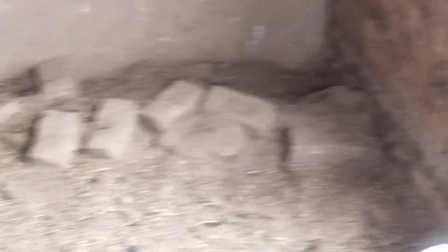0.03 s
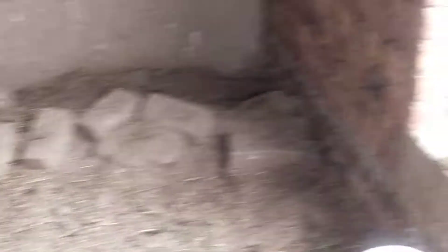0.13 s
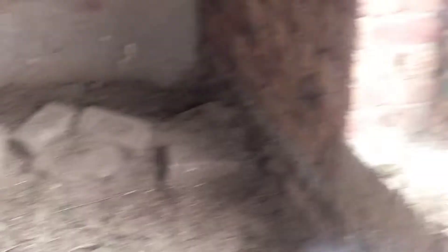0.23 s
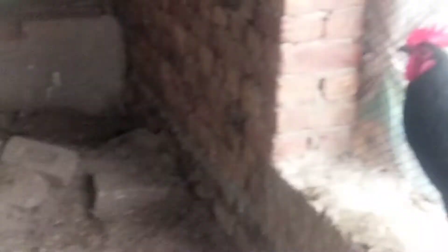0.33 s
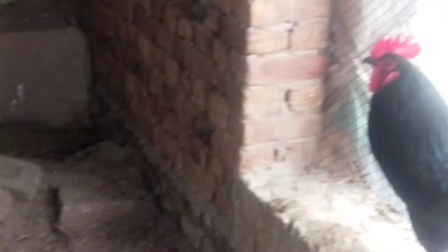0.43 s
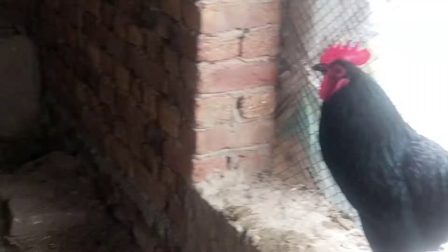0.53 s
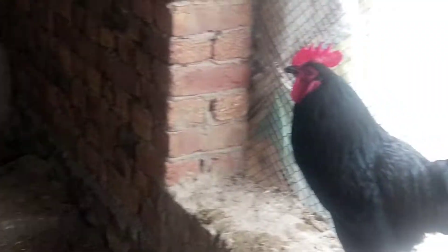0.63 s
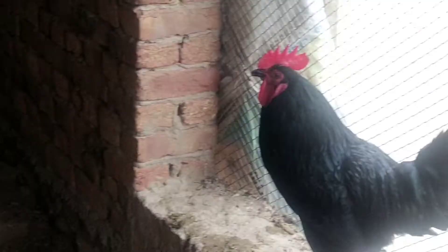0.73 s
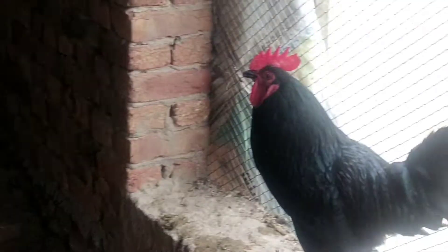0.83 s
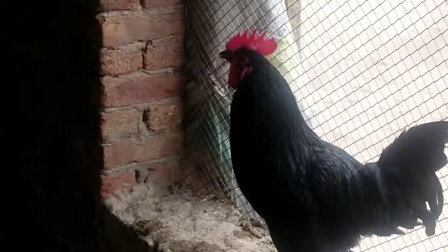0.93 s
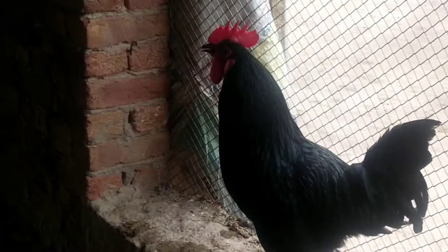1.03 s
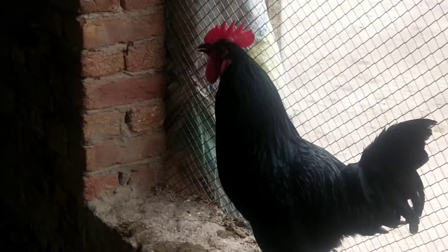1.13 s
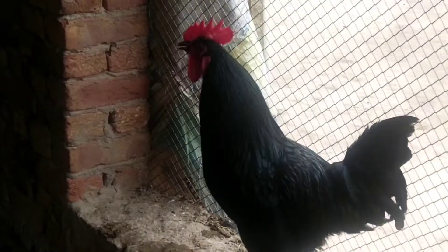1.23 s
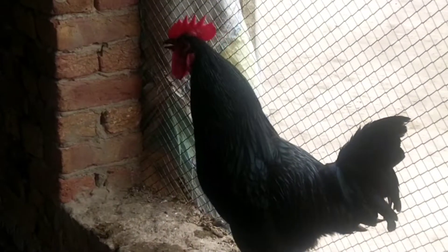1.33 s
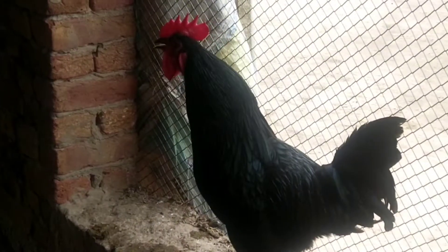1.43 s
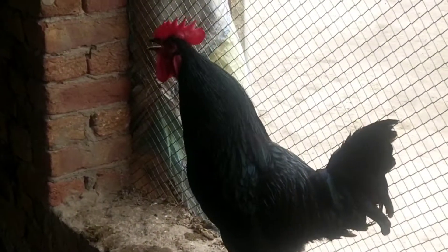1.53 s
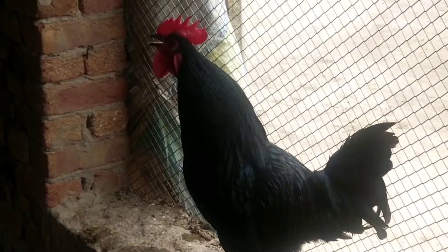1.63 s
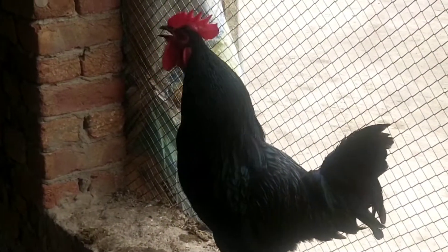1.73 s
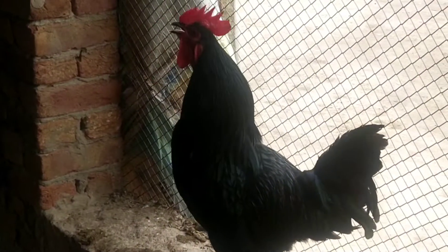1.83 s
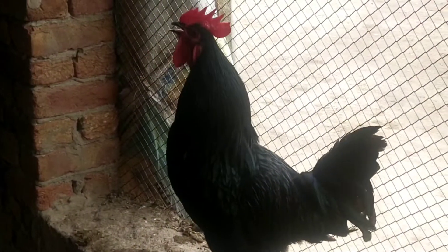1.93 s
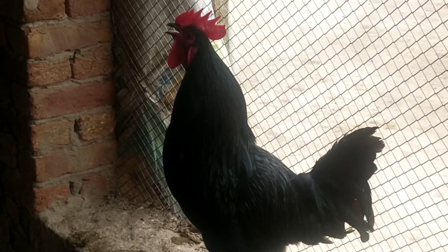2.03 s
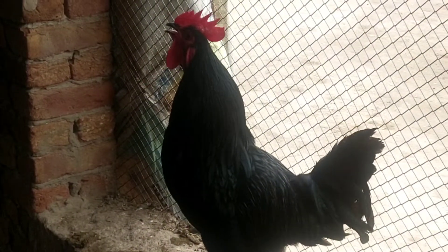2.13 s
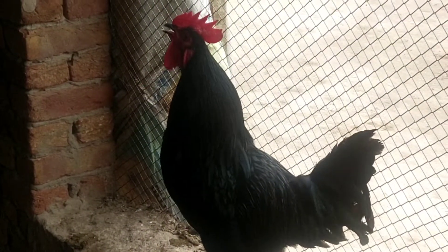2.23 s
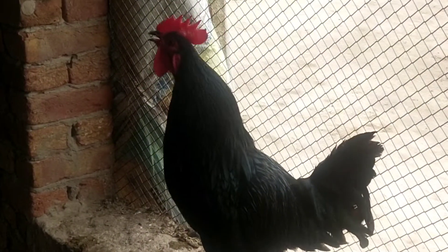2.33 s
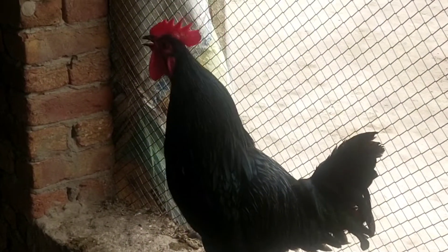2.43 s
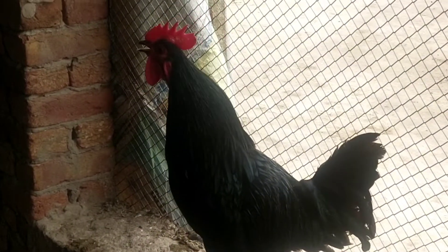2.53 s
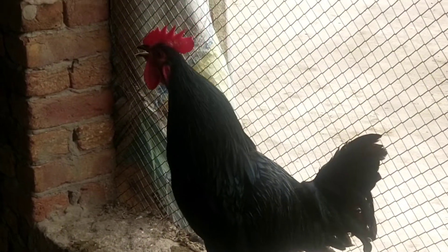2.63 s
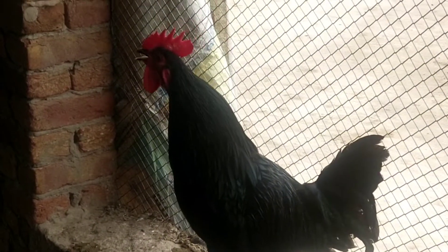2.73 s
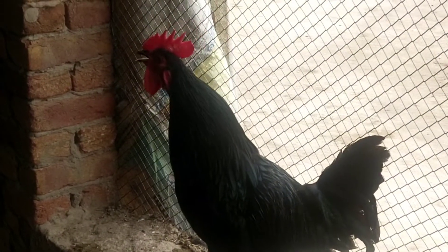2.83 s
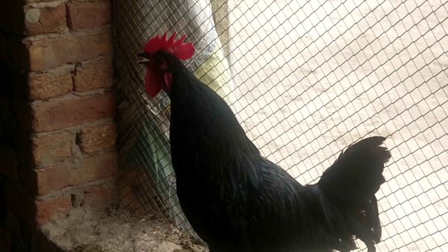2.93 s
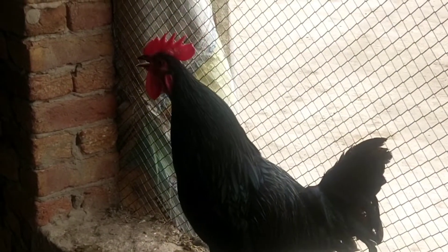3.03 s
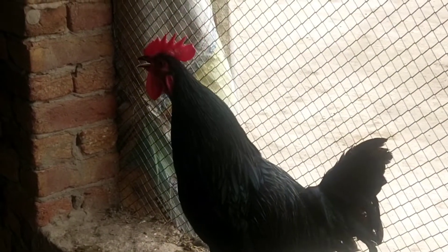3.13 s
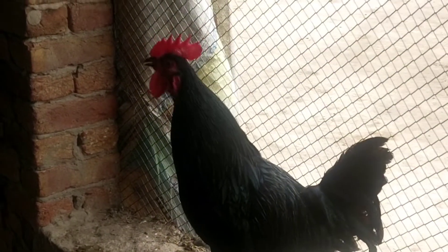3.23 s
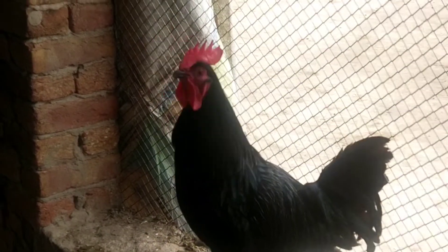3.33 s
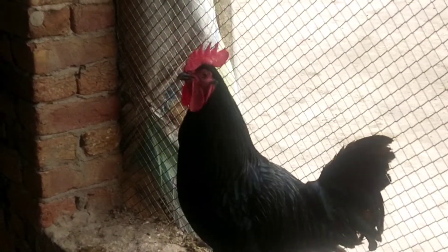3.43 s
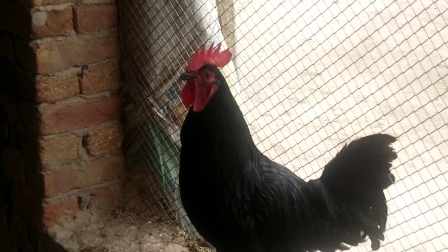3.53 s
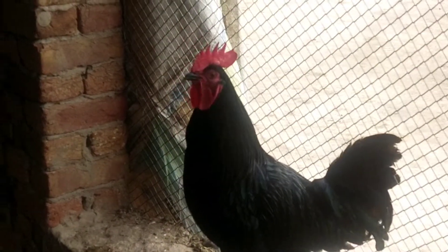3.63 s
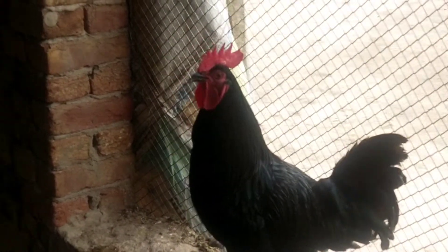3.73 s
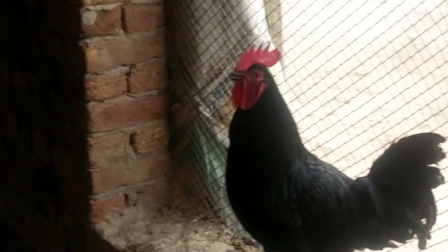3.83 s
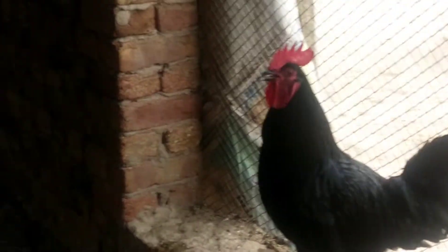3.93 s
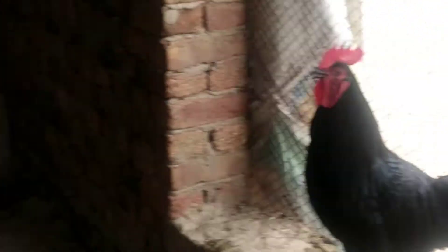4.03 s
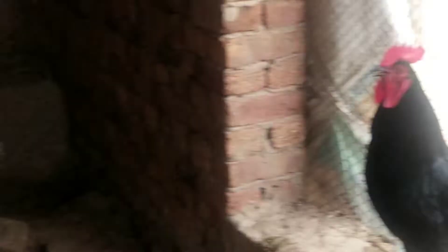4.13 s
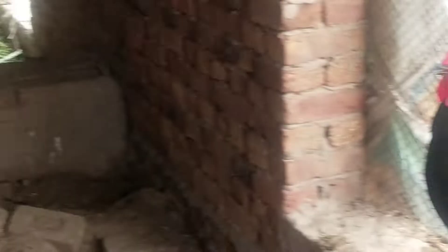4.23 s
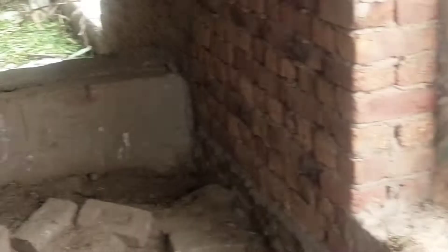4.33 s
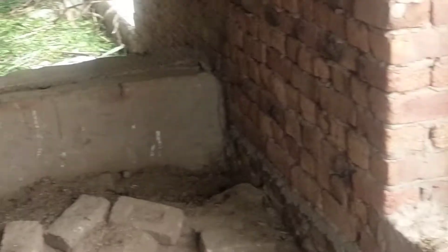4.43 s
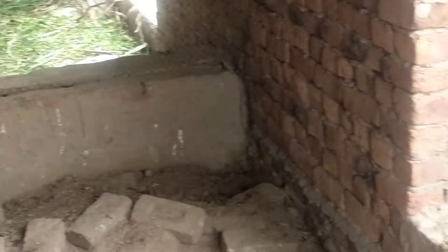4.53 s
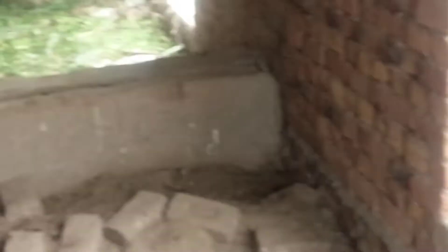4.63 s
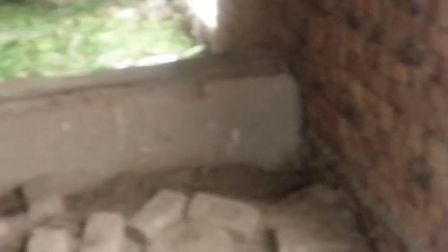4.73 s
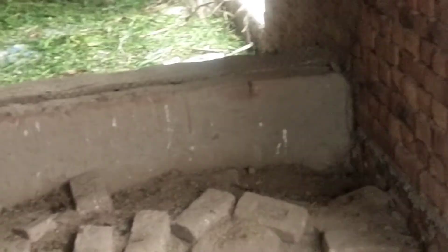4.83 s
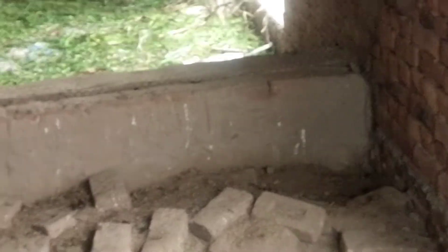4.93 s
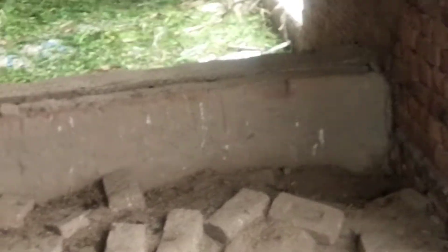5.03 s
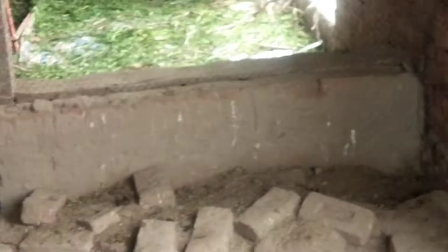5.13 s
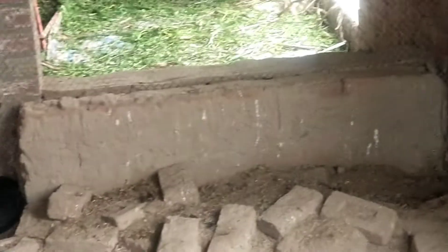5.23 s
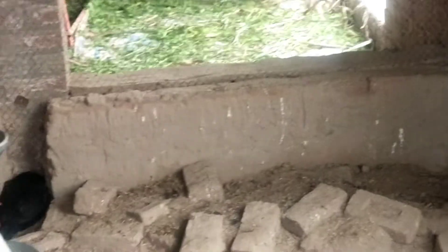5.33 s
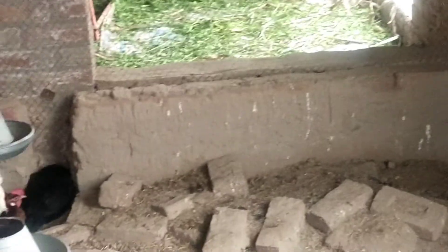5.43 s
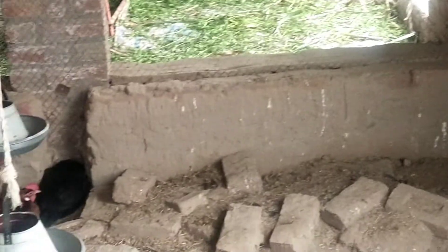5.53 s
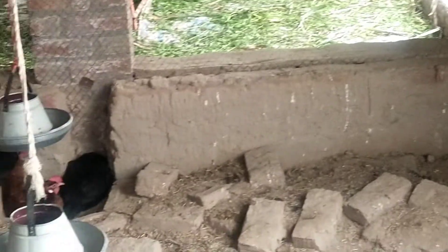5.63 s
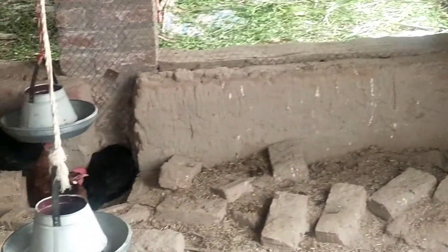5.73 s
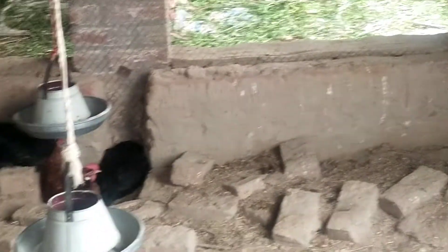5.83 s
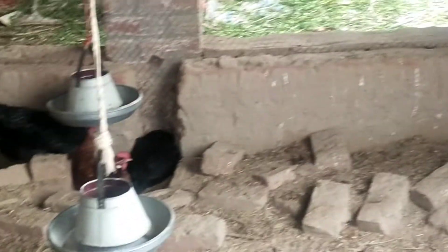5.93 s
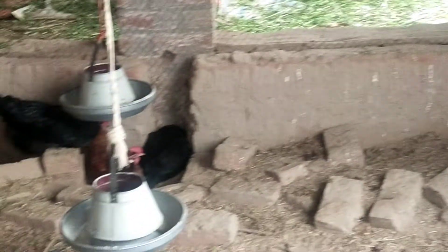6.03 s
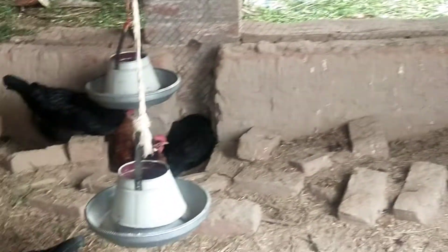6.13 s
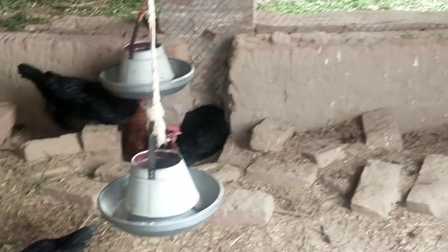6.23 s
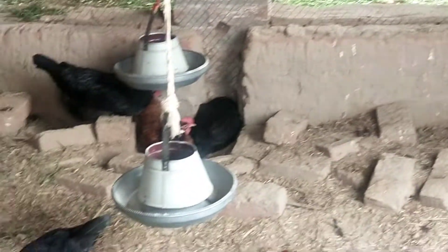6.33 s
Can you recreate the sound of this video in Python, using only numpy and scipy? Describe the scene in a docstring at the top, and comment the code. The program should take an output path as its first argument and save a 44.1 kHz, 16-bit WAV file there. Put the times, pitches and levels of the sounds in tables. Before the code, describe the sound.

Straw rustles softly over a low rumble in a brick pen. A nearby rooster crows once, loudly, starting hoarse, rising to a rough high note and holding a long one before trailing into a soft groan. Afterwards come quiet scuffs and dull knocks on dry dirt, a few light pecks at a feeder and one short hen cluck. The walls add a short echo.

```python
"""In a brick pen, a rooster crows once: a hoarse note, a high rough one, a long clean one, then a soft
groan as his air runs out. His voice is a stream of air pulses ringing in his throat. Afterwards he
breathes in, feet scuff the dirt, beaks tap a feeder and a hen clucks. The walls echo the birds and feet.
Underneath are a low rumble, rustling straw and, from far off, a faint whine and a brief drone."""
import sys
import numpy as np
from scipy import signal
from scipy.fft import rfft, irfft, next_fast_len
from scipy.io import wavfile
from scipy.ndimage import uniform_filter1d, minimum_filter1d

SR = 44100
rng = np.random.default_rng(int(sys.argv[2]) if len(sys.argv) > 2 else 0)


def log_audio(samples):
    """Write samples as a 16-bit WAV file to the path given in sys.argv[1]."""
    # one column per channel
    frames = np.atleast_2d(samples).T
    # limit to full scale, then quantise
    limited = np.clip(frames, -1, 1)
    pcm = np.round(limited * 32767).astype(np.int16)
    wavfile.write(sys.argv[1], SR, pcm)


N = 282240
TIME = np.arange(N) / SR


def from_db(db):
    """Turn decibels into a number to multiply by."""
    return 10 ** (np.asarray(db) / 20)


def rms_one(x):
    """Scale a sound to an average power of one."""
    return x / np.sqrt(np.mean(x ** 2) + 1e-20)


def evened(x, window_s=0.049):
    """Even out a sound so its power stays near one."""
    size = int(window_s * SR)
    power = uniform_filter1d(uniform_filter1d(x * x, size), size)
    return x / np.sqrt(np.abs(power) + 1e-12)


def in_time(rows):
    """Join timed rows with straight lines, one curve per column."""
    times, *columns = np.transpose(rows)
    return [np.interp(TIME, times, column) for column in columns]


def at_hz(points, hz):
    """Look up a value by frequency, on a scale of octaves."""
    frequencies, values = np.transpose(points)
    return np.interp(np.log(np.maximum(hz, 1)), np.log(frequencies), values)


def colour(x, points):
    """Give a sound its tone colour: make each frequency as strong as a table says."""
    size = next_fast_len(N + SR // 4, True)
    hz = np.maximum(np.arange(size // 2 + 1) * SR / size, 1)
    octaves_outside = np.abs(np.log2(hz / np.clip(hz, points[0][0], points[-1][0])))
    gain = from_db(at_hz(points, hz) - 30 * np.minimum(octaves_outside, 2))
    # make the filter ring after a sound, never before it (minimum phase)
    cepstrum = irfft(np.log(gain), size)
    cepstrum[1:size // 2] *= 2
    cepstrum[size // 2:] = 0
    return irfft(rfft(x, size) * np.exp(rfft(cepstrum)), size)[..., :N]


def band(x, low_hz, high_hz, order=4):
    """Keep what lies between two frequencies."""
    return signal.sosfilt(signal.butter(order, [low_hz, high_hz], "band", fs=SR, output="sos"), x + 1e-18)


def drift(rate):
    """A smooth random wobble that changes about `rate` times a second."""
    r = np.exp(-2 * np.pi * rate / SR)
    return rms_one(signal.lfilter([1], [1, -2 * r, r * r], rng.standard_normal(N + SR))[SR:])


def delayed(x, delay_ms):
    """The same sound, a little later."""
    return np.interp(TIME - delay_ms / 1000, TIME, x)


def ears(x, pan_db, lag_ms=0):
    """Place a sound: pan_db louder and lag_ms later in the left ear."""
    left, right = np.broadcast_to(x, (2, N))
    return np.array([delayed(left, lag_ms), right]) * from_db([[pan_db / 2], [-pan_db / 2]])


def stereo_noise(alike):
    """Hiss for two ears, from unrelated (0) to identical (1)."""
    mid, side = rng.standard_normal((2, N))
    return np.sqrt((1 + alike) / 2) * mid + np.sqrt((1 - alike) / 2) * side * np.array([[1], [-1]])


def grains(per_s, spread_db, alike):
    """Tiny random clicks of uneven size."""
    sizes = from_db(spread_db * np.minimum(rng.exponential(1, N), 4))
    return rms_one(stereo_noise(alike) * sizes * (rng.random(N) < per_s / SR))


def swell(start_s, length_s, rise_db_per_s, fall_db_per_s):
    """A loudness curve that rises, holds at one, then falls."""
    early, late = np.maximum(start_s - TIME, 0), np.maximum(TIME - start_s - length_s, 0)
    return from_db(-np.clip(rise_db_per_s * early + fall_db_per_s * late, 0, 200))


def blows(rows, t60):
    """A loudness curve of sudden hits, each fading by 60 dB in t60 seconds."""
    return sum(from_db(db - 60 * np.clip((TIME - s) / t60, 0, 3)) * (TIME >= s) for s, db, *_ in rows)


# how much the pen stirs (time [s], rumble level [dB])
STIR = [(0.0, -48), (0.43, -54.5), (1.25, -49), (2.1, -57), (2.6, -57), (3.92, -71.5), (4.06, -62),
        (4.17, -73), (4.99, -66.5), (5.19, -70.5), (5.47, -61), (5.72, -69), (6.29, -55), (6.4, -55.5)]
# spells of crackling straw (start [s], length [s], level [dB])
CRACKLES = [(0, 0.067, -62), (0.284, .02, -64.5), (1.19, 0.03, -63), (1.394, 0.056, -57),
            (4.069, 0.04, -64.5), (6.203, .2, -60)]
# tone of the rumble, the swish and the crackle (frequency [Hz], level [dB])
RUMBLE_COLOUR = [(21, -36), (35, -21), (57, 0), (172, 2), (211, -1), (264, 2.5), (331, -1), (473, -26.5),
                 (526, -22.5), (600, -21), (780, -46), (1320, -120)]
SWISH_COLOUR = [(240, -25), (400, 6), (520, -7), (657, 2), (734, -2), (1550, -12), (2580, -10),
                (3130, -31.5), (3910, -26.5), (4500, -27.5), (5850, -79.5), (9900, -120)]
CRACKLE_COLOUR = [(1760, -37.5), (3000, -5), (3920, -2.5), (4750, -9), (7640, -4), (9010, -8), (14800, -10),
                  (15500, -13)]
def rumble_and_straw(swish_db=-5, crackle_db=-21, rest_db=-78):
    """A low rumble and swishing, crackling straw rise and fall together, with a few brighter spells."""
    stir = from_db(in_time(STIR)[0])
    spells = sum(from_db(db) * swell(s, length, 250, 130) for s, length, db in CRACKLES)
    crackle = np.maximum(spells, np.hypot(stir * from_db(crackle_db), from_db(rest_db)))
    rumble = stir * rms_one(colour(stereo_noise(0.94), RUMBLE_COLOUR))
    swish = stir * from_db(swish_db) * rms_one(colour(stereo_noise(0.25), SWISH_COLOUR))
    stalks = crackle * rms_one(colour(grains(4400, 1.843, 0.081), CRACKLE_COLOUR))
    return rumble + ears(swish + stalks, pan_db=2.4)


# path of the whine (time [s], pitch [Hz], level [dB])
WHINE = [(0, 2696, -60), (.5, 2622, -81), (4.6, 2542, -92), (5.15, 2490, -76), (5.62, 2270, -72),
         (6.4, 2266, -77)]
def far_whine(jitter=0.014):
    """A thin, wavering tone drifts in from outside and slowly sinks."""
    pitch_hz, level_db = in_time(WHINE)
    wavering_hz = pitch_hz * (1 + jitter * drift(90))
    return from_db(level_db) * np.sin(2 * np.pi * np.cumsum(wavering_hz) / SR)


# feet in the straw (time [s], relative level [dB])
RUSTLES = [(0.074, -55), (0.091, -34), (0.124, -55), (0.792, -32), (0.829, -44), (0.864, -37.5)]
# tone of a rustle (frequency [Hz], level [dB])
RUSTLE_COLOUR = [(410, -24), (700, 10), (1820, 5), (2750, 12.5), (3930, -1.5), (4800, -8), (6850, -8),
                 (10000, -43), (13000, -62), (22000, -120)]
def rustles(gain_db=-11):
    """Stalks crush and settle under a foot."""
    stalks = rms_one(colour(grains(3000, 1.6, 0.078), RUSTLE_COLOUR))
    return from_db(gain_db) * blows(RUSTLES, t60=0.11) * stalks


def buzz(pitch_hz, jitter, half_db, rasp_db, flutter_hz=110, harmonics=26):
    """Unsteady pulses, as from a bird's voice box (syrinx); air hisses through each opening."""
    phase = 2 * np.pi * np.cumsum(pitch_hz * (1 + jitter * drift(flutter_hz))) / SR
    turn = np.exp(1j * phase)
    pulses = np.real(np.polyval(np.ones(harmonics), turn) * turn)   # adds equally strong harmonics
    alternation = 1 + from_db(half_db) * np.cos(phase / 2)   # strong, weak, strong: half the pitch
    hiss = rms_one(rng.standard_normal(N) * (1 + np.cos(phase)))
    return rms_one(pulses) * alternation + from_db(rasp_db) * hiss


def muffled_tone(rows, tone, jitter, rasp_db, fade_s=0.0092):
    """A low, muffled buzz that follows a table of pitch and level, silent before and after."""
    pitch_hz, level_db = in_time(rows)
    voice = colour(buzz(pitch_hz, jitter, half_db=-32, rasp_db=rasp_db), tone)
    inside_s = np.minimum(TIME - rows[0][0], rows[-1][0] - TIME)
    return evened(voice) * from_db(level_db) * np.clip(1 + inside_s / fade_s, 0, 1)


# path of the drone (time [s], pitch [Hz], level [dB])
DRONE = [(0.85, 104.2, -56), (1.13, 106.9, -54.5), (1.4, 114.9, -46), (1.52, 119.3, -47)]
# tone of the drone (frequency [Hz], level [dB])
DRONE_COLOUR = [(110, -2), (220, 8), (335, 2.5), (450, -2), (560, -12), (680, -2), (850, -24), (1350, -8),
                (2000, -42)]
def far_drone():
    """A faint, rough drone from outside rises in pitch."""
    return muffled_tone(DRONE, DRONE_COLOUR, jitter=0.0071, rasp_db=-1.5)


# tune of the crow (time [s], pitch [Hz])
CROW_PITCH = [(1.53, 560), (1.61, 635), (1.67, 650), (1.715, 680), (1.77, 610), (1.83, 620), (1.868, 830),
              (1.915, 872), (1.975, 782), (2.04, 818), (2.125, 830), (2.19, 778), (2.278, 745),
              (2.308, 555), (2.37, 508), (2.415, 545), (2.46, 638), (2.7, 644), (2.835, 650), (2.853, 738),
              (2.92, 743), (3.135, 716), (3.152, 640), (3.2, 585)]
# its notes (start [s], end [s], level [dB], growth over the note [dB], overtones [dB], treble [dB],
# jitter [share of pitch], half-pitch tone [dB], rasp [dB])
CROW_NOTES = [(1.561, 1.77, -15, 2, 1.5, -1, .02, -6, -6.5),
              (1.893, 1.942, -11.5, -5.5, 3, 4, .016, -31.5, -26.5),
              (1.966, 2.271, -11, -1, -1, 1, .021, -23.5, -27),
              (2.311, 2.42, -17.5, 2.5, 4, 2.5, .012, -33, -21.5),
              (2.474, 2.825, -14.5, 0, 0.5, -2.5, 0.0027, -2.5, -17.5),
              (2.854, 3.128, -17.5, 2, 6, -3.5, 0.0025, -27, -29),
              (3.136, 3.166, -10.5, 0.5, -3.5, -7, 0.02, -19, -18.5)]
# two pushes of air that carry the notes (start [s], end [s])
BREATHS = [(1.559, 1.7447), (1.861, 3.1655)]
# voice cracks, where the voice box slips between ways of vibrating
# (time [s], half length [s], roughness [about 0-1], kick to the lowest harmonic [dB])
VOICE_CRACKS = [(1.535, 0.023, 0.55, 4.5), (1.78, 0.06, 1.06, -3), (1.867, 0.01, 0.11, 7),
                (2.31, 0.011, 0, 7.5), (2.843, 0.0091, 0.14, -6.5), (2.86, 0.0092, 0.17, 8.5),
                (3.186, .03, 0.9, 2)]
def crow_melody(crack_jitter=0.06, resonance_hz=1715, width_hz=125, lift_db=9):
    """Notes glide into each other, cracks roughen them, and harmonics swell where the throat rings."""
    pitch_hz, = in_time(CROW_PITCH)
    note_edges = [(s, db + side * growth_db / 2, *rest)
                  for start, end, db, growth_db, *rest in CROW_NOTES
                  for s, side in ((start, -1), (end, 1))]
    level_db, overtones_db, treble_db, jitter, half_db, rasp_db = in_time(note_edges)
    airflow = np.max([swell(start, end - start, 897, 483) for start, end in BREATHS], axis=0)
    rough, kick_db = sum(np.outer([roughness, db], np.exp(-((TIME - s) / half_s) ** 2))
                         for s, half_s, roughness, db in VOICE_CRACKS)
    first_db = 0.79 * at_hz(THROAT, pitch_hz) + kick_db   # partly follows the throat's gain
    ring_db = lift_db * np.exp(-((2 * pitch_hz - resonance_hz) / width_hz) ** 2)
    # alternating pulses fill out the second and the top band
    second_db = overtones_db + ring_db + 10 * from_db(half_db)
    top_db = treble_db + 9 * from_db(half_db)
    bands_db = [first_db, second_db, overtones_db, treble_db, top_db]
    strengths = [airflow * from_db(level_db + db) for db in bands_db]
    rasp_db = 20 * np.log10(from_db(rasp_db) + rough)
    return pitch_hz, jitter + crack_jitter * rough, half_db, rasp_db, strengths


# tone of the throat and of air rushing past the beak (frequency [Hz], level [dB])
THROAT = [(300, -30.5), (520, -13.5), (650, -2), (760, 6), (880, -9.5), (970, -8.5), (1300, -6.5),
          (1700, -2.5), (2250, -6), (2590, -26), (2930, -16.5), (3100, -14.5), (3260, -41), (3800, -41.5),
          (4450, -22.5), (4900, -41), (5300, -24.5), (5650, -34.5), (6500, -19.5), (6900, -26),
          (7600, -33.5), (9100, -41.5), (11000, -38), (15500, -36)]
SIZZLE_COLOUR = [(3750, -28.5), (4050, -15.5), (4500, -6), (5000, -7), (5400, -2), (5750, -7), (6600, 3.5),
                 (7700, -14.5), (8500, -6.5), (9200, -20), (11000, -11), (13000, -12), (15600, -15.5)]
# bands of the voice (low [Hz], high [Hz], gain [dB], left over right [dB], left ear delay [ms])
VOICE_BANDS = [(479, 1044, -1, -2.5, 0.14), (1033, 2096, -11, 4, 0.24), (2103, 3500, -12.5, 5, 0.24),
               (4080, 9500, -24, 3, .4), (9770, 15800, -36.5, 11, .4)]
def crow(sizzle_db=-31, chest_db=-45.5, shake_hz=36, shake=0.7):
    """Pulses ring the rooster's throat, whose bands swell as his neck stretches and his beak opens."""
    pitch_hz, jitter, half_db, rasp_db, strengths = crow_melody()
    # under strain the pitch shakes in and out of the throat's main resonance
    tremor = np.sin(2 * np.pi * np.cumsum(shake_hz * (1 + 0.25 * drift(15))) / SR)
    pulses = buzz(pitch_hz * (1 + shake * jitter * tremor), jitter, half_db, rasp_db, flutter_hz=259.5)
    throat = near_walls(colour(pulses, THROAT))
    voice = 0
    for (low_hz, high_hz, gain_db, pan_db, lag_ms), strength in zip(VOICE_BANDS, strengths):
        part = evened(band(throat, low_hz, high_hz, order=5), window_s=0.033)
        voice = voice + ears(part * strength * from_db(gain_db), pan_db, lag_ms)
    # the jet of air sizzles when the voice box rattles
    rattle_db = np.minimum(rasp_db + 10, 0)
    jet = strengths[3] * from_db(sizzle_db + rattle_db + 2 * drift(40))
    hiss = rms_one(near_walls(colour(rng.standard_normal(N), SIZZLE_COLOUR)))
    sizzle = ears(jet * hiss, pan_db=7, lag_ms=0.46)
    # a trace of the rushing air comes through his chest
    chest = strengths[1] * from_db(chest_db) * rms_one(band(stereo_noise(0.85), 230, 380, order=2))
    return voice + sizzle + chest


# echoes off close walls (left ear delay [ms], right ear delay [ms], level [dB])
NEAR_WALLS = [(3.1, 2.8, -8.5), (7.3, 8.1, -12.5), (12.4, 12.6, -6.5), (19.0, 18.8, -7)]
def near_walls(x):
    """Quick echoes mix with a wavering pitch and make its loudness flutter."""
    return x + sum(from_db(db) * np.array([delayed(x, left_ms), delayed(x, right_ms)])
                   for left_ms, right_ms, db in NEAR_WALLS)


# path of the groan (time [s], pitch [Hz], level [dB])
GROAN = [(3.27, 301.5, -41), (3.335, 315.4, -36), (3.45, 322.4, -42), (3.52, 330.6, -47.5),
         (3.63, 313, -43)]
# tone of the groan (frequency [Hz], level [dB])
GROAN_COLOUR = [(310, 9), (640, 12), (950, 14.5), (1280, -10), (1600, -13), (1930, -1.5), (2250, -10),
                (2600, -23), (5000, -31)]
def groan():
    """The rooster groans softly as his air runs out."""
    return muffled_tone(GROAN, GROAN_COLOUR, jitter=0.011, rasp_db=-33)


# knocks on lumps of earth (time [s], relative level [dB])
CLODS = [(3.652, -26.5), (4.554, -35.5), (4.691, -47), (4.843, -52), (4.906, -33), (4.917, -38),
         (4.971, -36), (5.28, -35.5), (5.295, -39), (5.444, -19.5), (5.469, -25)]
def clods(gain_db=-14):
    """Feet knock lumps of earth, whose softness dulls every knock."""
    thud = rms_one(colour(stereo_noise(0.79), [(250, 13.5), (800, 9), (2400, -15), (4000, -44)]))
    return from_db(gain_db) * band(thud * blows(CLODS, t60=0.019), 210, 3300, order=2)


# tone of the breath in (frequency [Hz], level [dB])
GASP_COLOUR = [(240, -38), (400, -3), (648, -17), (841, 1.5), (1430, -13), (1650, 2.5), (2200, -14.5),
               (2860, -4), (4820, -26), (6850, -18.5), (9000, -43), (11700, -70), (19800, -120)]
def gasp(start_s=3.9, length_s=0.13, level_db=-58):
    """The rooster refills his air sacs with a faint hiss."""
    hiss = rms_one(colour(stereo_noise(0.21), GASP_COLOUR))
    return from_db(level_db) * swell(start_s, length_s, 700, 140) * hiss


# scuffs on the dirt (start [s], length [s], relative level [dB], extra grit [dB])
SCUFFS = [(4.501, .02, -62, -7), (4.706, 0.15, -57, -1), (4.847, 0.067, -39, -5.5),
          (4.902, 0.015, -31, -2.5), (5.288, 0.081, -44, -4.5), (5.45, 0.043, -40.5, -2.5)]
# tone of the dull earth and the sharp grit (frequency [Hz], level [dB])
EARTH_COLOUR = [(130, -32), (250, -11), (430, -1), (750, 4), (1050, -2.5), (1320, 1), (1800, -26)]
GRIT_COLOUR = [(760, -14.5), (1300, 0.5), (2230, -1.5), (2810, -14), (4120, -26.5), (6030, -46),
               (6620, -41), (8270, -61), (12000, -53.5), (15600, -72), (22000, -120)]
def scuffs(earth_db=-1, grit_db=-2):
    """Soles grind the dry floor: dull grains and sharper grit come in clumps."""
    strokes = [np.outer(from_db([db, db + extra_db]), swell(s, length, 1500, 197))
               for s, length, db, extra_db in SCUFFS]
    earth_level, grit_level = np.max(strokes, axis=0)
    clumps = rms_one(from_db(1.5 * drift(70)))
    earth = earth_level * from_db(earth_db) * rms_one(colour(grains(2400, 2.2, 0.65), EARTH_COLOUR))
    grit = grit_level * from_db(grit_db) * rms_one(colour(grains(1600, 2.3, 0.2), GRIT_COLOUR))
    return (earth + grit) * clumps


# squeaks under a sole (time [s], level [dB], pitch [Hz])
SQUEAKS = [(4.972, -36.5, 2430), (4.981, -44, 2290)]
def squeaks(t60=0.049):
    """A stone slips and gives a tiny chirp."""
    return sum(blows([(s, db)], t60) * np.sin(2 * np.pi * hz * (TIME - s)) for s, db, hz in SQUEAKS)


# pecks at the feeder (time [s], relative level [dB], extra treble [dB])
PECKS = [(5.7511, -58.5, 4), (5.8674, -34.5, -14), (6.0067, -27.5, -2.5), (6.1674, -29, -6.5),
         (6.248, -31.5, -11)]
# tone of the feeder (frequency [Hz], level [dB])
FEEDER_COLOUR = [(180, -37), (300, -1.5), (571, -9), (907, -4.5), (1240, -21.5), (1490, -7.5), (2000, -4.5),
                 (2790, 2), (3070, -4.5), (5850, -15.5), (6900, -9), (8700, -22), (15500, -62)]
def pecks(crack_db=-6, rattle_db=-17, tip_db=-8):
    """Each peck is a bright tick of the beak tip, a dry crack and a short rattle of the feeder."""
    crack = from_db(crack_db) * blows(PECKS, t60=0.087)
    rattle = from_db(rattle_db) * blows(PECKS, t60=0.17)
    tick = from_db(tip_db) * blows([(s, db + treble_db) for s, db, treble_db in PECKS], t60=0.032)
    feeder = (crack + rattle) * rms_one(colour(stereo_noise(0.089), FEEDER_COLOUR))
    beak = tick * rms_one(band(stereo_noise(0.11), 6700, 11900))
    return feeder + beak


# tone of the hen's voice (frequency [Hz], level [dB])
CLUCK_COLOUR = [(380, -9), (760, -3), (1150, -15), (1550, -9.5), (2200, -27), (3500, -34)]
def cluck(start_s=5.96, length_s=0.055, pitch_hz=385, level_db=-45.5):
    """A hen gives one short, hoarse note, more breath than tone."""
    voice = colour(buzz(np.full(N, pitch_hz), jitter=0.055, half_db=-31, rasp_db=5.5), CLUCK_COLOUR)
    return evened(voice) * from_db(level_db) * swell(start_s, length_s, 1800, 400)


# how long the pen rings (frequency [Hz], time to fade by 60 dB [s])
PEN_RING = [(200, 0.33), (1400, 0.37), (4000, 0.35), (14000, 0.22)]
def pen_echoes(x, first_echo_s=0.011):
    """Brick walls return a blur of echoes, different at each ear; the treble dies first."""
    t = TIME[:int(0.7 * SR)]
    edges_hz = np.geomspace(100, 16000, 9)
    noise = rng.standard_normal((2, len(t)))
    echoes = sum(band(noise, low, high, order=2) * from_db(-60 * t / at_hz(PEN_RING, np.sqrt(low * high)))
                 for low, high in zip(edges_hz, edges_hz[1:]))
    echoes = echoes * (t > first_echo_s)
    return signal.fftconvolve(x, echoes / np.sqrt(np.sum(echoes ** 2) / 2), axes=1)[:, :N]


def scene():
    """Birds and feet share the echoes of the pen, over the quiet background."""
    rooster = crow()
    last_air = ears(groan(), pan_db=4, lag_ms=0.19)
    hen = ears(cluck(), pan_db=3.5)
    ground = ears(scuffs() + clods() + squeaks() + pecks() + rustles(), pan_db=2.6) + hen
    echoes = pen_echoes(from_db(-9.5) * rooster + from_db(-12) * last_air + from_db(-5) * ground)
    return rooster + last_air + ground + gasp() + echoes + rumble_and_straw() + far_whine() + far_drone()


def record(dry, ceiling=0.88, bass_hz=54, top_hz=15700):
    """Gently turn down the loudest peaks, then cut the deep bass and the highest treble."""
    size = int(0.008 * SR)
    gain = ceiling / np.maximum(np.abs(dry).max(axis=0), ceiling)
    held_gain = minimum_filter1d(gain, 2 * size)
    smooth_gain = uniform_filter1d(uniform_filter1d(held_gain, size), size)
    thinned = signal.sosfilt(signal.butter(6, bass_hz, "high", fs=SR, output="sos"), dry * smooth_gain)
    return signal.sosfilt(signal.ellip(10, 0.2, 80, top_hz, fs=SR, output="sos"), thinned)


dry = scene()
out = record(dry)
log_audio(out)
```